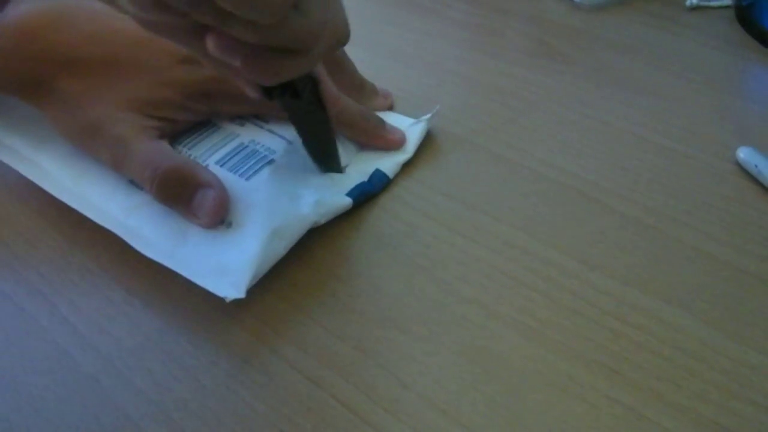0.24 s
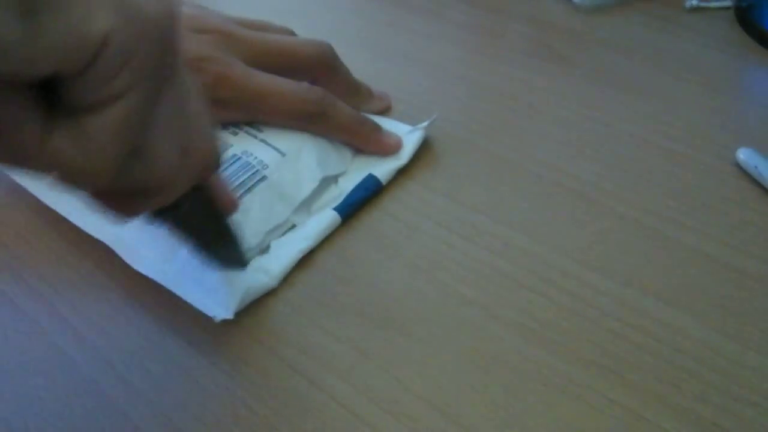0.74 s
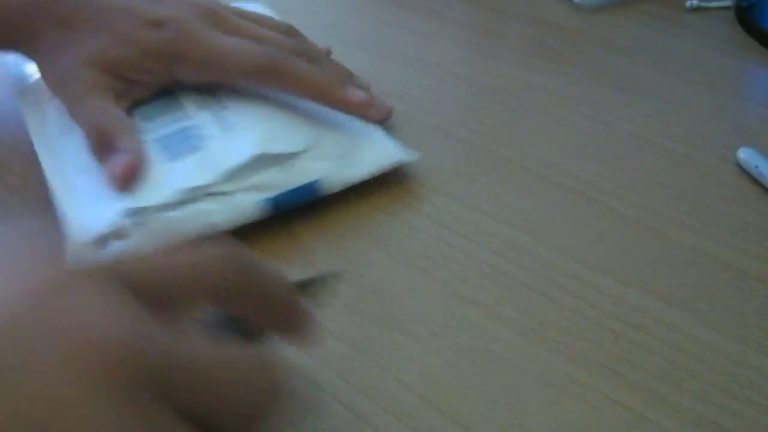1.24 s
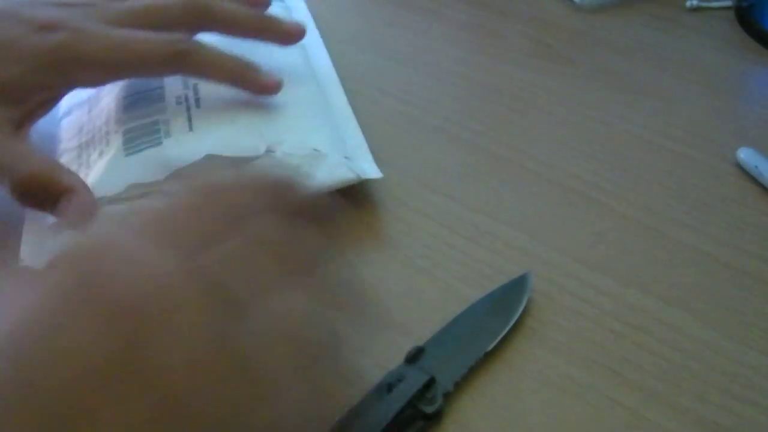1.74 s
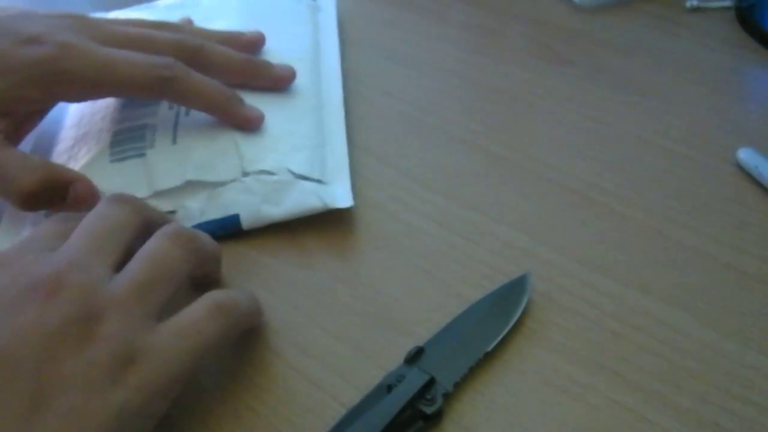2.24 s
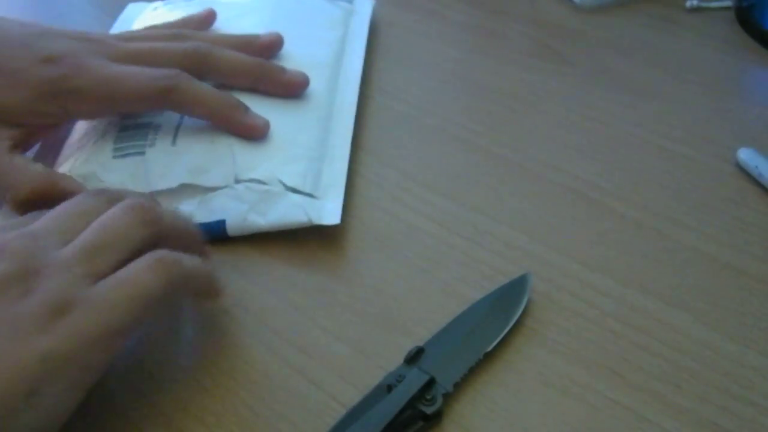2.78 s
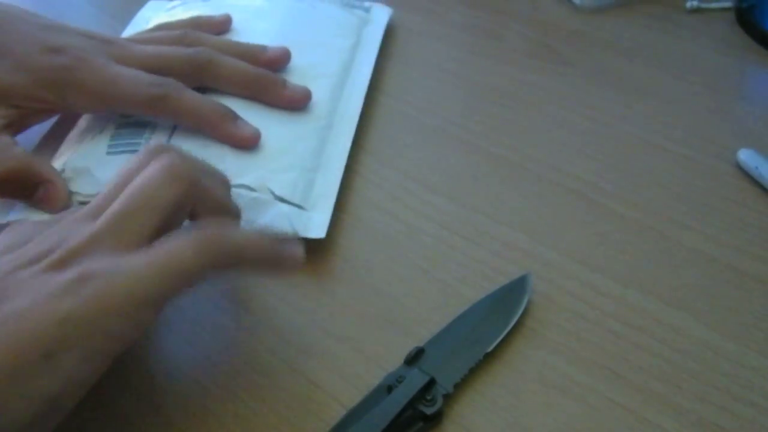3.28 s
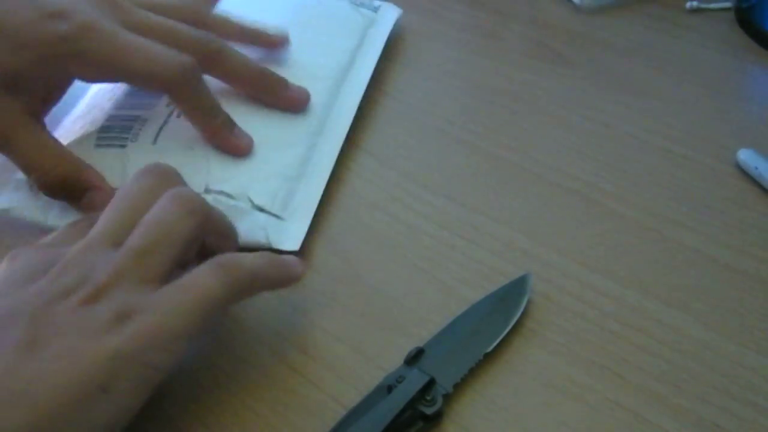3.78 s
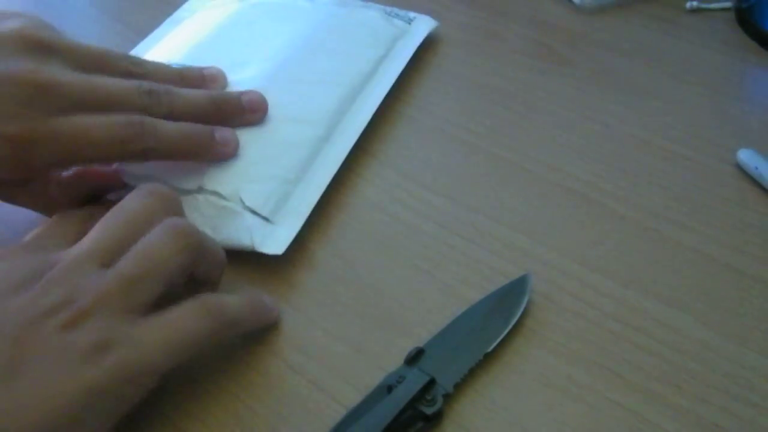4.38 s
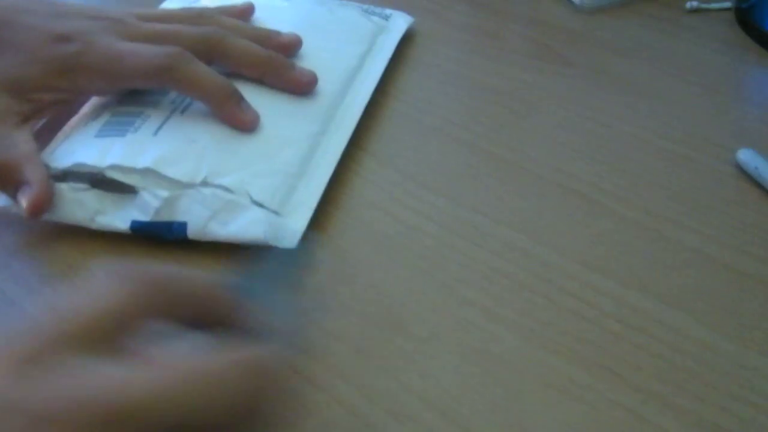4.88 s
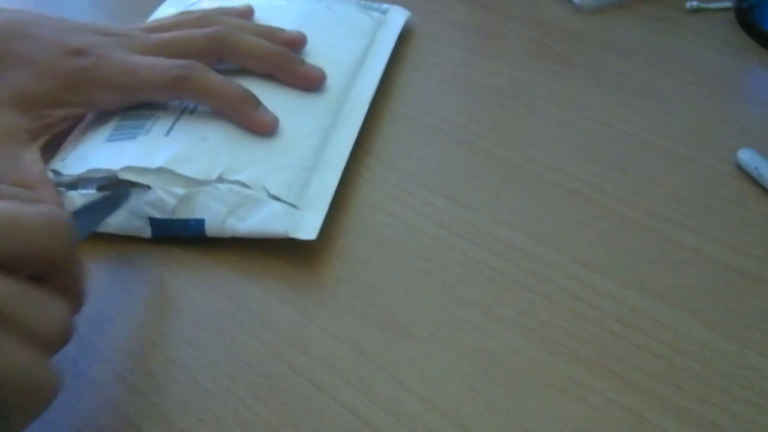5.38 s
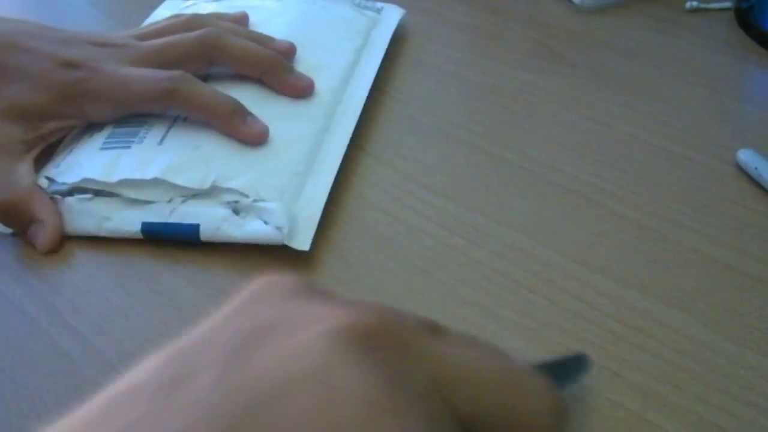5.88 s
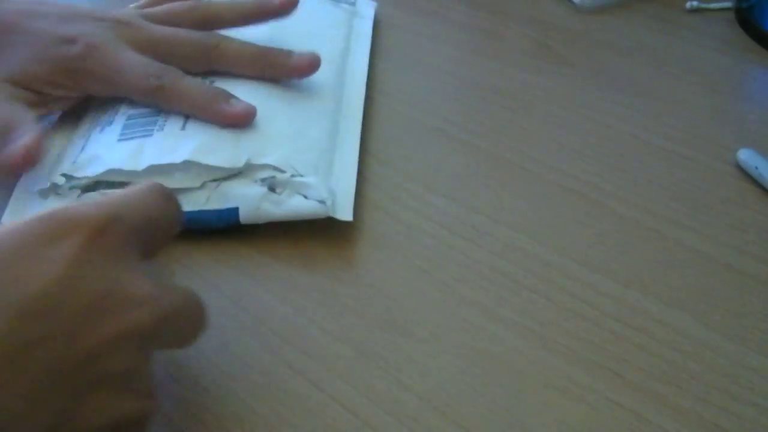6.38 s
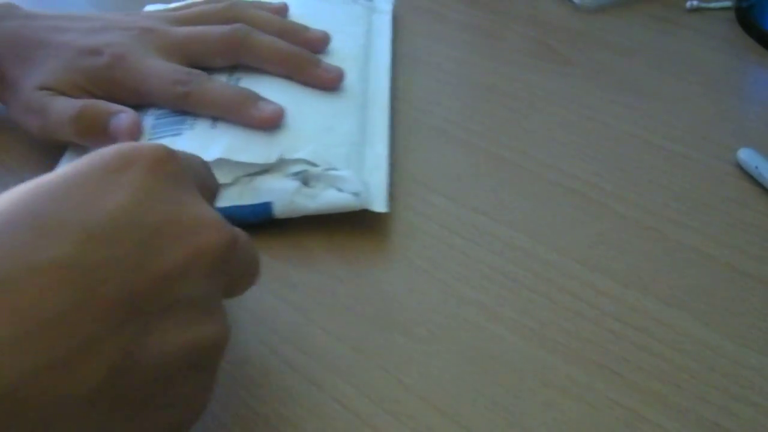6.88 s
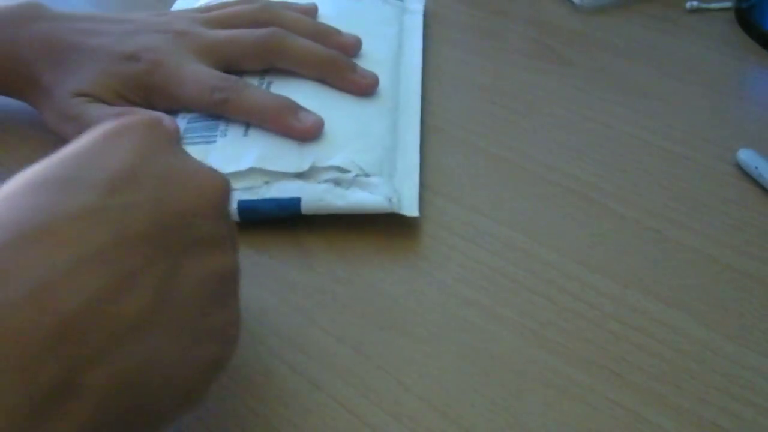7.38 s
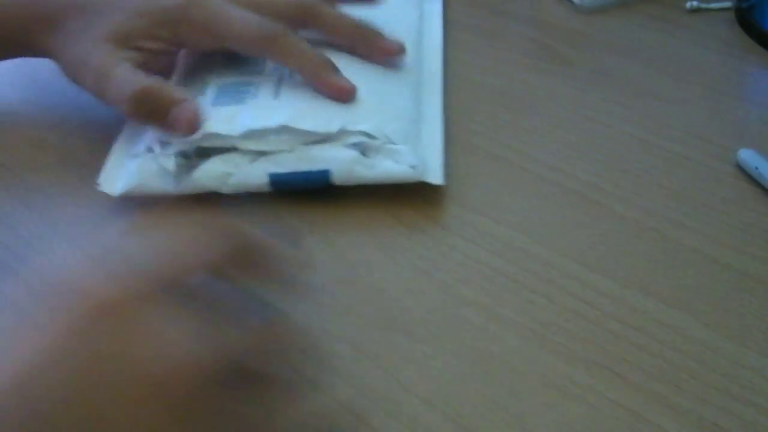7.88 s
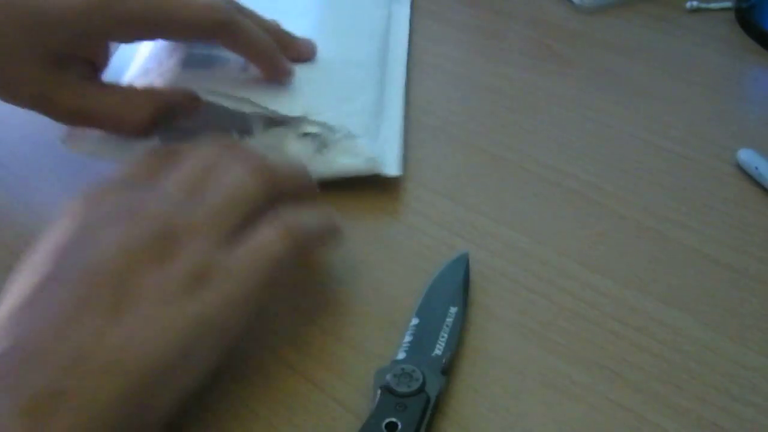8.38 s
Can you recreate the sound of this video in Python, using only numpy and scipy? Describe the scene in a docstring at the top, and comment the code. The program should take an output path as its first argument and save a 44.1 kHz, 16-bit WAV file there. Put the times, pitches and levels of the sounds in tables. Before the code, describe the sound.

Dense papery crackling and ripping opens the scene, followed by steel and handle knocks on a hollow-sounding wooden desk. Sparser rustles, loud single creases and dull padded pops follow as hands work the mailer. A second brief cutting flurry comes past the middle, then a tight cluster of snaps and pops and another set-down. Close microphone, small room with short reflections, soft air and hum.

```python
"""On a wooden desk in a small room, a pocket knife saws through a padded paper mailer, close to a microphone.
The paper rustles as crowds of tiny clicks and hiss, and rips in short, dense runs of clicks.
Creases snap as short noise bursts, and the padded wall pops as bursts sent through a resonance.
Knife and hand knock and push on the desk, whose ringing tones die away.
Behind it all are dense room reflections, soft air noise, a wavering low hum and a thin whine."""
import sys
import numpy as np
from scipy import signal
from scipy.io import wavfile
from scipy.ndimage import uniform_filter1d

SR = 44100
rng = np.random.default_rng(int(sys.argv[2]) if len(sys.argv) > 2 else 0)


def store_pcm(level_fs):
    """Save levels as 16-bit WAV."""
    pcm = np.round(np.clip(level_fs, -1, 1) * 32767).astype(np.int16)
    wavfile.write(sys.argv[1], SR, np.atleast_2d(pcm).T)


N = 380583  # length of the sound in samples

# All levels in the tables are relative: the functions set the final loudness.
# How firmly the hands hold the mailer. Each row: time in seconds, level of the quiet crackle in dB.
GRIP_LEVELS = [(0.0, -29), (0.24, -36), (0.38, -22), (0.67, -21.5), (1.87, -40), (2.09, -32), (2.5, -38.5),
               (3.15, -31), (3.32, -38), (4.37, -30.5), (4.95, -40.5), (5.45, -42), (5.7, -34), (6.25, -37),
               (7.28, -36), (7.52, -26.5), (8.05, -30), (8.63, -24.5)]
# Single strokes of blade or hand over the paper.
# Each row: start in seconds, length in seconds, crackle level in dB, whole-sheet level in dB.
PAPER_STROKES = [(0.202, 0.081, -22.5, -31), (0.328, 0.13, -21.5, -36), (.67, 0.054, -17.5, -36),
                 (0.727, 0.11, -18, -49), (0.902, 0.058, -19, -43), (1.478, 0.062, -33, -29.5),
                 (1.89, 0.11, -24.5, -35.5), (2.068, 0.3, -29.5, -59), (2.468, 0.089, -32, -41.5),
                 (3.024, 0.18, -41, -57), (3.21, 0.036, -22.5, -29), (3.601, 0.12, -27.5, -36),
                 (3.807, 0.12, -38, -41), (4.19, 0.11, -30.5, -57), (4.449, 0.11, -25.5, -34.5),
                 (4.768, 0.062, -31.5, -30.5), (5.101, 0.12, -25, -35), (5.395, 0.32, -33, -47),
                 (5.535, 0.091, -26.5, -31), (5.598, .09, -22, -24), (5.713, 0.11, -17, -22.5),
                 (6.004, 0.24, -30.5, -40), (6.446, 0.1, -27, -35.5), (6.79, 0.051, -39, -31),
                 (7.166, .04, -36, -35.5), (7.333, 0.14, -28, -35.5), (7.456, 0.11, -19, -35),
                 (7.65, 0.09, -29, -33), (7.908, 0.038, -34, -37), (8.34, 0.17, -24.5, -34)]
# Moments when the hands come to rest. Each row: middle in seconds, length in seconds.
HAND_RESTS = [(1.75, 0.17), (2.4, 0.061), (3.014, 0.12), (3.376, 0.11), (5.084, 0.054), (5.345, .1),
              (6.4, 0.062), (6.73, 0.041), (7.12, .1)]
# Runs of tearing fibres.
# Each row: start in seconds, length in seconds, crackle level in dB, whole-sheet level in dB.
FIBRE_RIPS = [(.232, .012, -9.5, -30.5), (.350, 0.021, -12, -18), (0.46, .013, -16, -41),
              (.475, .014, -10, -34), (.491, 0.012, -10.5, -17.5), (0.793, 0.013, -15.5, -33),
              (.928, 0.0075, -14.5, -40), (0.939, 0.011, -12.5, -30), (3.268, 0.0075, -12.5, -34),
              (5.099, 0.0075, -25, -30.5), (5.604, 0.022, -21.5, -32), (5.657, 0.013, -17.5, -16.5),
              (5.731, .016, -19, -14.5), (5.774, .007, -18, -35), (5.797, 0.02, -12, -20),
              (5.84, 0.016, -16.5, -22), (7.193, 0.0075, -18.5, -18), (7.412, .014, -19.5, -25.5),
              (7.501, .007, -21, -30), (7.536, 0.061, -20, -30)]
# The loudest creases snapping over. Each row: time mark in seconds, level in dB, crease size from 0 to 1.
CREASE_SNAPS = [(.1351, -12.5, 0.4), (.1865, -3.5, 0.63), (.2136, -10, .55), (.3342, -8.5, 0.4),
                (.5403, 1, 0.4), (.6695, -12, .6), (.6978, -5, .55), (.7404, -3.5, 0.3), (.756, -5, 0.35),
                (.7956, 3, 0.43), (.902, -12.5, .02), (.9655, -7, .7), (.9864, -5, 0.08), (1.0883, -7, 0),
                (1.2053, -18, 0.16), (1.8585, -10.5, 0.95), (1.9804, -17, 0), (2.0536, -11.5, 0.27),
                (2.1375, -2.5, 0.38), (2.2712, -2.5, 0.3), (2.3132, -10.5, 0.22), (2.692, -2.5, 0.38),
                (2.8846, -6.5, 0.83), (2.949, -19, 0.2), (2.9877, -17, 0.23), (3.0482, -15, 0.3),
                (3.244, -2, 0.85), (3.2694, -2.5, 0.81), (3.5441, -17.5, 0.4), (3.7351, -13, .45),
                (3.8365, -11, 0.65), (4.082, -12.5, 0.25), (4.489, -1, 0.9), (4.95, -17.5, 0.07),
                (5.1868, -9.5, 0.66), (5.2392, -18, 0.14), (5.405, -15, 0.6), (5.4974, -14.5, 0.4),
                (5.6726, -2.5, 0.83), (6.2507, -19, .95), (6.8123, -0.5, 0.72), (7.3582, -15, 0.8),
                (7.4493, -9.5, 0.86), (7.4734, -9, 0.4), (7.5018, -6, .5), (7.5178, 2.5, 0.2),
                (7.5482, -3, 0.6), (7.6588, -11, 0.9), (7.8993, -14, 0), (8.0356, -20, 0.4),
                (8.271, -13, 0.4), (8.506, -11, 0.84), (8.6254, -5.5, .75)]
# The padded wall buckling or tapped by a finger.
# Each row: time mark in seconds, level in dB, centre pitch in Hz.
WALL_POPS = [(.942, -14, 380), (1.113, -20.5, 1210), (1.13, -15, 485), (2.169, -17, 845), (2.459, -23, 915),
             (2.821, -22, 1040), (3.211, -20.5, 870), (3.242, -11.5, 720), (3.387, -23.5, 1850),
             (3.621, -21.5, 684), (3.686, -11.5, 646), (3.807, -21.5, 570), (4.235, -15.5, 676),
             (4.244, -15.5, 1750), (4.488, -12, 1720), (4.504, -11.5, 860), (4.612, -16, 680),
             (5.097, -21.5, 1030), (5.259, -23.5, 850), (5.529, -18.5, 1175), (5.806, -13.5, 690),
             (5.994, -19, 540), (6.061, -19.5, 520), (6.481, -10.5, 1550), (6.639, -26.5, 1110),
             (6.81, -13, 1410), (6.96, -18, 930), (7.239, -16.5, 1150), (7.324, -14, 1610),
             (7.5, -11, 1340), (7.538, -10.5, 1180), (7.549, -6, 1390), (7.573, -8, 1860),
             (7.589, -12.5, 1500), (7.672, -2, 1230), (7.792, -16, 500), (8.070, -9, 1000),
             (8.37, -16.5, 940), (8.556, -17, 990)]
# Small patches of wall that buckle by chance. Each entry: centre pitch in Hz.
PATCH_PITCHES = [610, 850, 1150, 1500, 1950, 2600]
# Resonances of the hollow pouch. Each row: pitch in Hz, width in Hz, level in dB.
POUCH_MODES = [(483, 50, -11), (683.6, 10.3, 2), (917, 41, -10.5)]
# Knife and hand landing on the desk.
# Each row: start in seconds, wood level in dB, handle clack level in dB, steel tick level in dB.
DESK_KNOCKS = [(.940, -27.5, -31, -44), (1.133, -35, -25, -22.5), (1.389, -15.5, -17.5, -8),
               (1.411, -30, -24, -25), (1.515, -14, -17, -20), (1.588, -24, -10.5, -22),
               (1.595, -17.5, -18, -33), (4.687, -33.5, -34, -44), (4.80, -35, -34, -42),
               (5.849, -24.5, -23, -18), (7.675, -26, -21, -15.5), (8.068, -29, -18, -12),
               (8.127, -17, -23.5, -29), (8.177, -26, -27, -34), (8.192, -26, -26, -38)]
# Dull pushes of the hand on the desk top. Each row: start in seconds, level in dB.
HAND_THUMPS = [(.5, -39.5), (.932, -39), (3.276, -42), (4.154, -38), (4.488, -40), (4.687, -30),
               (5.841, -40), (7.666, -38), (8.09, -32), (8.471, -40.5)]
# Ringing tones of the desk top. Each row: pitch in Hz, level in dB, time to fade by 60 dB in seconds.
DESK_MODES = [(246, -9.5, 0.072), (344, -4, 0.076), (429, 1, 0.051), (515, -2.5, 0.06), (564, -7, 0.046),
              (696, -5.5, 0.074), (798, -12, 0.07), (924, -6, 0.029), (1182, -10.5, 0.042)]
# The desk's lowest tones. Each row: pitch in Hz, level in dB, time to fade by 60 dB in seconds.
DESK_LOW_MODES = [(53.3, -9, 0.12), (62.6, -6, 0.079), (96, -13.5, 0.1), (124, -7, 0.36), (169, -15, 0.05),
                  (217, -7.5, 0.085)]
# Tone colour of breaking fibres. Each row: frequency in Hz, level in dB.
FIBRE_COLOUR = [(200, -50), (1000, -25), (2500, -18), (4200, -9), (5200, -5), (6100, 0.5), (7000, -5),
                (8300, -13.5), (10500, -24.5), (16000, -40)]
# Tone colour of the whole sheet. Each row: frequency in Hz, level in dB.
SHEET_COLOUR = [(80, -17), (250, -7.5), (450, -3.5), (800, -4), (1300, -1), (2100, -1), (3200, -3),
                (5000, -7.5), (12000, -18.5)]
# Tone colour of the finest fibres. Each row: frequency in Hz, level in dB.
FIZZ_COLOUR = [(1000, -39), (5500, -18.5), (7600, 2), (10500, -9.5), (13000, -13), (16000, -24.5)]
# Tone colour of the knife handle. Each row: frequency in Hz, level in dB.
CLACK_COLOUR = [(40, -60), (150, -19), (400, -13.5), (900, 2), (1500, 2), (2500, -7.5), (4000, -17.5),
                (9000, -45)]
# Tone colour of the steel. Each row: frequency in Hz, level in dB.
STEEL_COLOUR = [(50, -45), (300, -22), (1200, -9), (2400, -3), (4200, -4), (6100, 0), (8000, -11),
                (15000, -24)]
# How long the room echoes. Each row: frequency in Hz, time to fade by 60 dB in seconds.
ROOM_FADE = [(100, 0.42), (500, 0.35), (1500, 0.32), (4000, 0.35), (8000, 0.18), (15000, 0.14)]
# Tone colour of the still room air. Each row: frequency in Hz, level in dB.
AIR_COLOUR = [(20, -11), (45, 4.5), (60, 6), (85, -5.5), (125, -4.5), (170, 1.5), (300, -2), (600, -9.5),
              (1500, -13), (4000, -13), (6100, -11), (9000, -73), (16000, -40)]
# The low hum. Each row: pitch in Hz, level in dB.
HUM_TONES = [(57.3, -64), (121.8, -57)]

GRIP_CRACKLE_DB, GRIP_SHEET_DB = -1, -12  # what the grip stirs in the fibres and in the whole sheet
REST_DB = -6  # how far the grip level drops in the middle of a rest
# A stroke takes hold, eases off as it goes, then lets go.
ATTACK_S, SAG_DB, RELEASE_DB_PER_S = 0.018, 3.0, 206
# A big crease moves more of the sheet; a tiny one only fizzes.
SHEET_PER_SIZE_DB, FIZZ_PER_SIZE_DB = 30.0, -31
WHINE_HZ, EDGE_HZ = 15734, 16100  # pitch of the whine; upper edge of the microphone's range


def amp(db):
    """Turns decibels into a gain."""
    return 10 ** (np.asarray(db) / 20)


def evened(x):
    """Scales a sound to an average (rms) level of 1."""
    return x / np.sqrt(np.mean(x ** 2) + 1e-20)


def peaked(x):
    """Scales a sound to a peak of 1."""
    return x / (abs(x).max() + 1e-12)


def read(points, hz):
    """Reads a table between its rows, on a log-frequency axis."""
    table_hz, value = np.transpose(points)
    return np.interp(np.log(hz + 1), np.log(table_hz + 1), value)


def add(mix, s, sound):
    """Adds a sound into the mix at time s, cut off where the mix ends."""
    part = mix[round(s * SR):][:len(sound)]
    part += sound[:len(part)]


def colour(x, points, size=2048):
    """Gives a sound a tone colour with a filter of unit energy that only rings after its input."""
    gain = amp(read(points, abs(np.fft.fftfreq(size, 1 / SR))))
    # minimum phase: the filter's energy comes as early as it can
    spectrum = np.exp(np.conj(signal.hilbert(np.log(gain))))
    response = np.fft.ifft(spectrum).real[:size // 2]
    return signal.oaconvolve(x, response / np.linalg.norm(response))


def clicks(count, per_s, spread_db, cap=4.36):
    """Fibres letting go at random: many small clicks, a few large, scaled to rms 1."""
    size = amp(spread_db * np.minimum(rng.exponential(1, count), cap))
    sign = rng.choice([-1, 1], count)
    happens = rng.random(count) < per_s / SR
    return evened(size * sign * happens)


def burst(decay_s, size=2048):
    """A dying cluster of tiny contacts: fading noise of unit energy."""
    x = rng.standard_normal(size) * np.exp(-np.arange(size) / SR / decay_s)
    return x / np.linalg.norm(x)


def ring(modes):
    """Fading tones of a struck object, each starting at a random point of its cycle."""
    t = np.arange(SR // 2) / SR
    tones = 0
    for hz, db, t60 in modes:
        tones = tones + amp(db - 60 * t / t60) * np.sin(2 * np.pi * (hz * t + rng.random()))
    highest_hz = modes[-1][0]
    return peaked(tones * (1 - np.exp(-t * highest_hz)))  # soft start, about a cycle of the highest tone


def flutter(size):
    """Random unevenness of rms 1, smoothed over a window of size samples."""
    return evened(signal.oaconvolve(rng.standard_normal(N), np.hanning(size), "same"))


def effort(grip_db, stroke_db):
    """Level over time in dB: the power of the grip, slack at rests, plus that of every stroke."""
    t = np.arange(N) / SR
    resting = sum(np.exp(-(2 * (t - s) / length) ** 2) for s, length in HAND_RESTS)
    grip = np.interp(t, *np.transpose(GRIP_LEVELS)) + grip_db + REST_DB * resting
    power = amp(grip) ** 2
    age = t[:SR]  # seconds since the stroke began
    for (s, length, *_), db in zip(PAPER_STROKES, stroke_db):
        sag = SAG_DB * np.minimum(age / length, 1)
        release = RELEASE_DB_PER_S * np.maximum(age - length, 0)
        attack = np.minimum(age / ATTACK_S, 1)
        add(power, s, (attack * amp(db - sag - release)) ** 2)
    return 10 * np.log10(power)


def rustle(crackle_db=-2.5, sheet_db=-4.0, fizz_db=-12.5, fizz_growth=1.13):
    """Clumped fibre clicks over a fine sliding hiss; they also shake the whole sheet."""
    _, _, fibre_level, sheet_level = np.transpose(PAPER_STROKES)
    work = effort(GRIP_CRACKLE_DB, fibre_level)
    flex = effort(GRIP_SHEET_DB, sheet_level)
    # slow catches, with quick slips within them
    clumps = amp(2.23 * flutter(size=600) + 3.0 * flutter(size=130))
    # small creases, heard one by one
    small_creases = signal.oaconvolve(clicks(N, 110, 6.0, cap=2.7), burst(0.00023))
    ticks = evened(small_creases[:N])
    hiss = rng.standard_normal(N)
    grains = clumps * (0.75 * clicks(N, 2500, 2.65) + 0.65 * hiss) + 0.79 * ticks
    # the sheet shares some of the fibre sound and adds clicks of its own
    flexing = 0.59 * grains + 0.75 * clumps * clicks(N, 600, 2.9)
    crackle = colour(grains * amp(work + crackle_db), FIBRE_COLOUR)
    # harder work breaks more of the finest fibres, so the sound brightens
    fizz_level = work.max() + fizz_growth * (work - work.max()) + fizz_db
    fizz = colour(clumps * clicks(N, 1200, 3.7) * amp(fizz_level), FIZZ_COLOUR)
    sheet = colour(flexing * amp(flex + sheet_db), SHEET_COLOUR)
    return (crackle + fizz + sheet)[:N]


def rips(crackle_db=2.0, sheet_db=-2.0, fizz_db=-16.5, spread_db=1.0):
    """The blade breaks through: a dense run of fibre clicks that stops abruptly."""
    out = np.zeros(N)
    for s, length, fibre_level, sheet_level in FIBRE_RIPS:
        count = max(int(length * SR), 100)
        run = signal.windows.tukey(count, 0.2) * clicks(count, 3500, spread_db, cap=3.2)
        add(out, s, amp(fibre_level + crackle_db) * colour(run, FIBRE_COLOUR))
        add(out, s, amp(sheet_level + sheet_db) * colour(run, SHEET_COLOUR))
        add(out, s, amp(fibre_level + fizz_db) * colour(run, FIZZ_COLOUR))
    return out


def snaps(crack_db=1.0, sheet_db=-32.0, fizz_db=3.5, settle=0.29, heavy_settle=1.0):
    """A crease flips in about a millisecond; a bigger one is duller and the paper round it settles more."""
    out = np.zeros(N)
    for s, db, size in CREASE_SNAPS:
        start = s + 0.0006
        flip = burst(0.00087) + (settle + heavy_settle * size ** 2) * burst(0.0063)
        sheet_level = db + sheet_db + SHEET_PER_SIZE_DB * size
        fizz_level = db + fizz_db + FIZZ_PER_SIZE_DB * size
        add(out, start, amp(db + crack_db) * peaked(colour(flip, FIBRE_COLOUR)))
        add(out, start, amp(sheet_level) * peaked(colour(burst(0.005), SHEET_COLOUR)))
        add(out, start, amp(fizz_level) * peaked(colour(burst(0.0005), FIZZ_COLOUR)))
    return out


def pops(level_db=-0.5, width=0.63):
    """A patch of padded wall buckles and rings briefly; width is a share of its pitch."""
    out = np.zeros(N)
    for s, pop_level, hz in WALL_POPS:
        push = colour(burst(0.0044), SHEET_COLOUR)
        patch = signal.lfilter(*signal.iirpeak(hz, 1 / width, SR), push)
        add(out, s + 0.00187, amp(pop_level + level_db) * peaked(patch))
    return out


def crinkles(level_db=-13.0, per_s=4.0, spread_db=1.5, width=0.37, decay_s=0.002):
    """Small patches of the wall buckle at random, louder the more the sheet is flexed."""
    sheet_level = np.transpose(PAPER_STROKES)[3]
    flex = amp(effort(GRIP_SHEET_DB, sheet_level) + level_db)
    out = np.zeros(N)
    for hz in PATCH_PITCHES:
        patch = signal.lfilter(*signal.iirpeak(hz, 1 / width, SR), burst(decay_s))
        buckles = clicks(N, per_s, spread_db, cap=2.1)
        out += evened(signal.oaconvolve(buckles, patch)[:N])
    return flex * evened(out)


def pouch(x):
    """The air and padding inside the mailer ring briefly with every flex of its walls."""
    out = x.copy()
    for hz, width, db in POUCH_MODES:
        out += amp(db) * signal.lfilter(*signal.iirpeak(hz, hz / width, SR), x)
    return out


def knocks(wood_db=2.5, clack_db=22.0, tick_db=27.0, boom_db=-15.0):
    """Steel ticks, the handle clacks and the desk top rings under them."""
    out = np.zeros(N)
    for s, wood, clack, tick in DESK_KNOCKS:
        add(out, s, amp(wood + wood_db) * ring(DESK_MODES))
        add(out, s, amp(wood + boom_db) * ring(DESK_LOW_MODES))
        add(out, s, amp(clack + clack_db) * colour(burst(0.0039), CLACK_COLOUR))
        add(out, s, amp(tick + tick_db) * colour(burst(0.0023), STEEL_COLOUR))
    return out


def thumps(level_db=0.5, settle_s=0.028, settle_db=-7.0):
    """A hand presses on the desk top: one dull push, with a loose rumble as the palm settles."""
    out = np.zeros(N)
    for s, thump_level in HAND_THUMPS:
        level = thump_level + level_db
        palm = signal.fftconvolve(burst(settle_s, size=SR // 4), ring(DESK_LOW_MODES))
        add(out, s, amp(level) * ring(DESK_LOW_MODES))
        add(out, s, amp(level + settle_db) * peaked(palm))
    return out


def room(x, count=4):
    """Dense reflections of a small room, each band fading at its own speed; several patterns take turns."""
    size, wet = SR // 2, np.zeros(N)
    turn = np.arange(N) // 600 % count  # a new pattern every 600 samples
    for k in range(count):
        late_enough = np.arange(size) > 0.004 * SR
        happens = rng.random(size) < 4000 / SR
        taps = rng.choice([-1.0, 1.0], size) * happens * late_enough
        hz, t, bands = signal.stft(taps, SR, nperseg=256)
        fade = amp(-60 * t / read(ROOM_FADE, hz)[:, None])
        tail = signal.istft(bands * fade, SR, nperseg=256)[1]
        # patterns blend into each other at steady power; abs guards against tiny negatives
        share = np.sqrt(abs(uniform_filter1d(1.0 * (turn == k), size=400)))
        wet += signal.fftconvolve(x * share, tail / np.linalg.norm(tail))[:N]
    return wet


def background(air_db=-48.0, whine_db=-52.5):
    """Still room air as coloured noise, a low hum of wavering phase and a thin electrical whine."""
    t = np.arange(N) / SR
    hum = 0
    for hz, db in HUM_TONES:
        waver = np.interp(t, np.linspace(0, t[-1], 60), rng.standard_normal(60))
        hum = hum + amp(db) * np.sin(2 * np.pi * hz * t + 1.4 * waver)
    whine = amp(whine_db) * np.sin(2 * np.pi * WHINE_HZ * t)
    air = amp(air_db) * colour(rng.standard_normal(N), AIR_COLOUR, size=8192)[:N]
    return air + np.sqrt(2) * (hum + whine)  # root 2 turns rms levels into sine peaks


def scene(paper_wet_db=-10.0, pop_wet_db=-8.0, desk_wet_db=-4.5, soak_hz=3400.0):
    """Paper and knife on the desk, with the room behind them."""
    paper = pouch(rustle() + rips() + snaps())
    hollow = pouch(pops() + crinkles())
    desk = knocks() + thumps()
    # the wide desk top sends mostly its lower notes into the room
    radiated = signal.sosfilt(signal.butter(1, soak_hz, fs=SR, output="sos"), desk)
    to_room = amp(paper_wet_db) * paper + amp(pop_wet_db) * hollow + amp(desk_wet_db) * radiated
    return (paper + hollow + desk + room(to_room) + background())[None]


def record(dry, notch_hz=4816.0, notch_q=10.4, bass_hz=36.0):
    """The microphone rounds off the loudest cracks, has a narrow notch and loses deep bass and top treble."""
    x = dry / (1 + (dry / 0.72) ** 6) ** (1 / 6)
    x = signal.lfilter(*signal.iirnotch(notch_hz, notch_q, SR), x)
    x = signal.sosfilt(signal.butter(4, bass_hz, "highpass", fs=SR, output="sos"), x)
    treble_limit = signal.firwin(511, EDGE_HZ, window=("kaiser", 9), fs=SR)
    return signal.oaconvolve(x, treble_limit[None], "same")


dry = scene()
out = record(dry)
store_pcm(out)
```